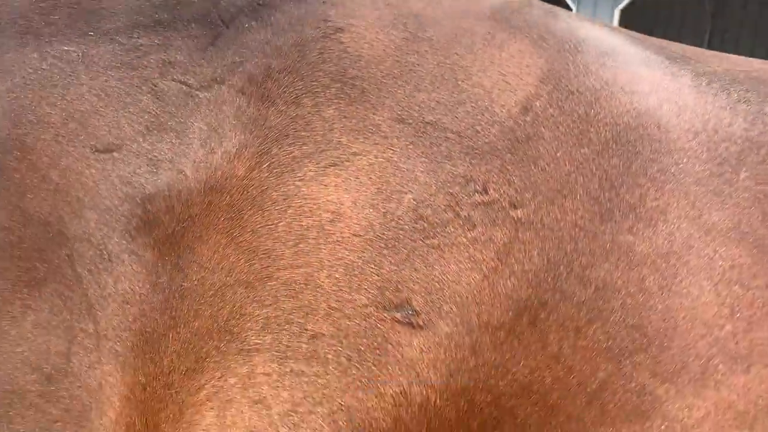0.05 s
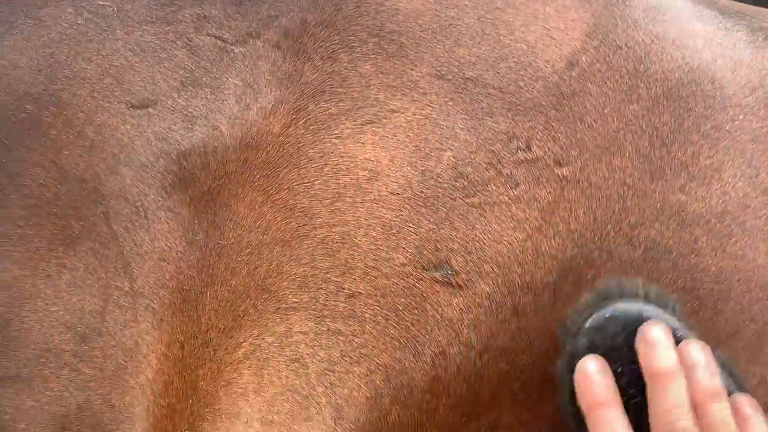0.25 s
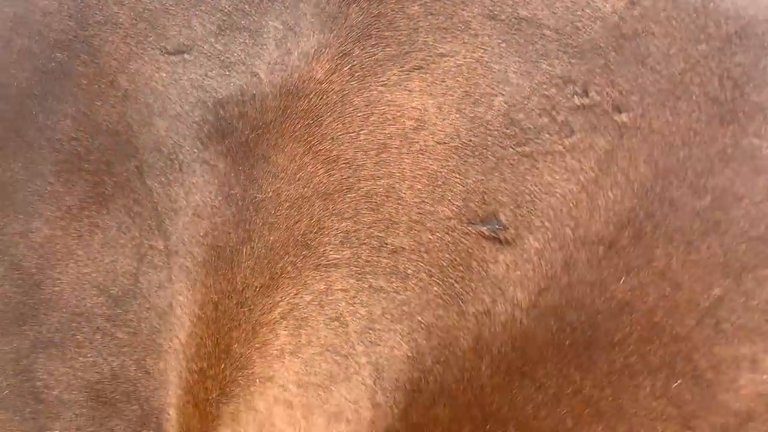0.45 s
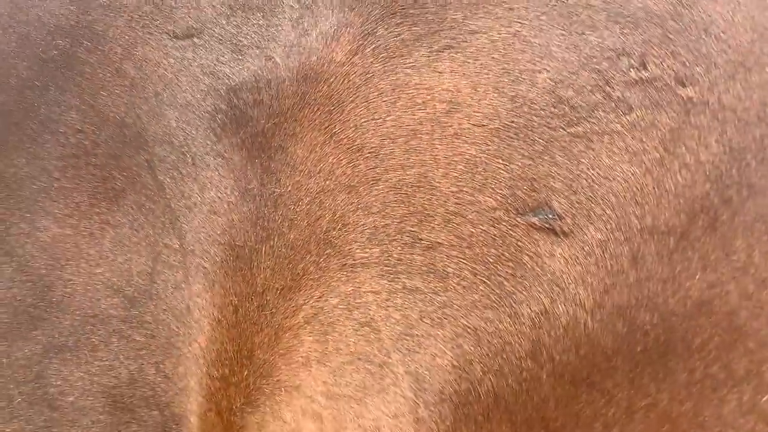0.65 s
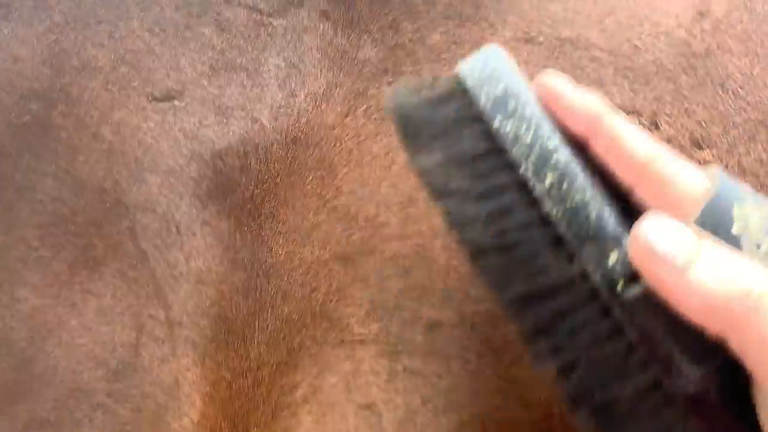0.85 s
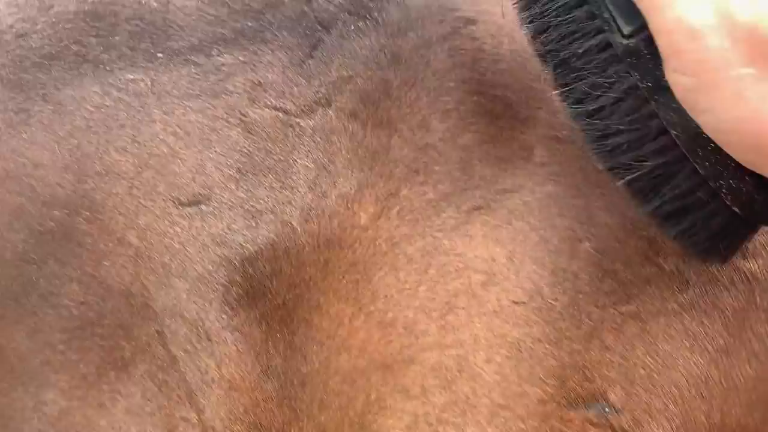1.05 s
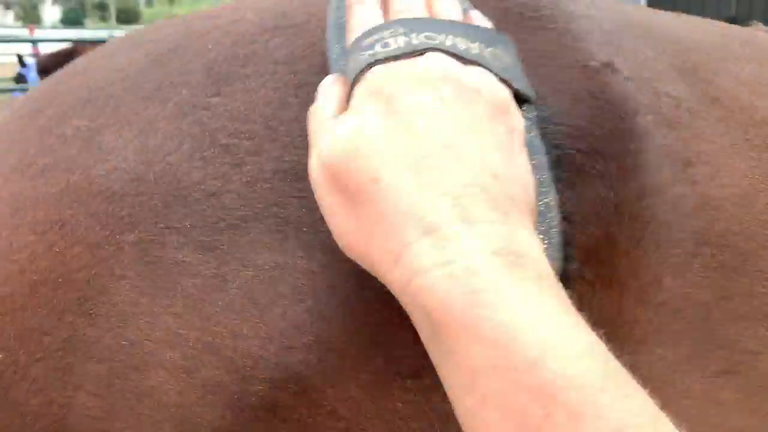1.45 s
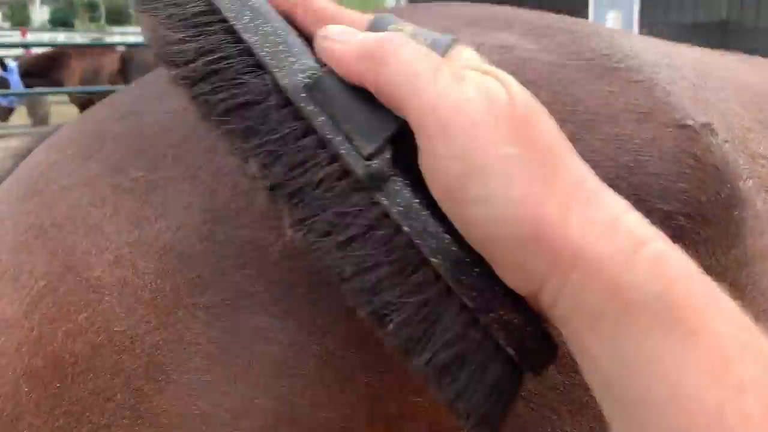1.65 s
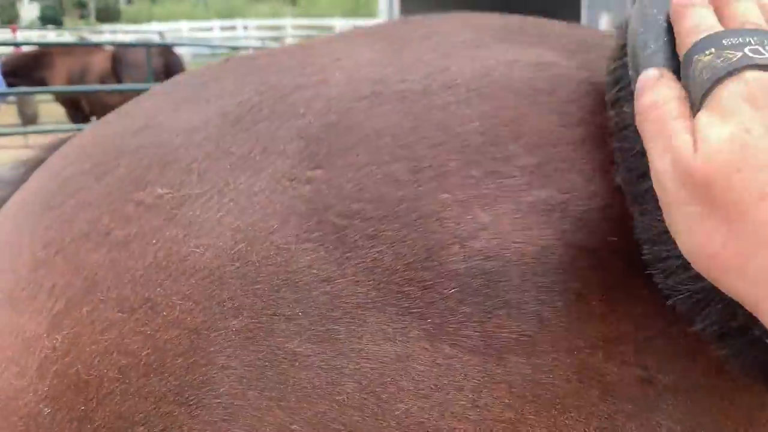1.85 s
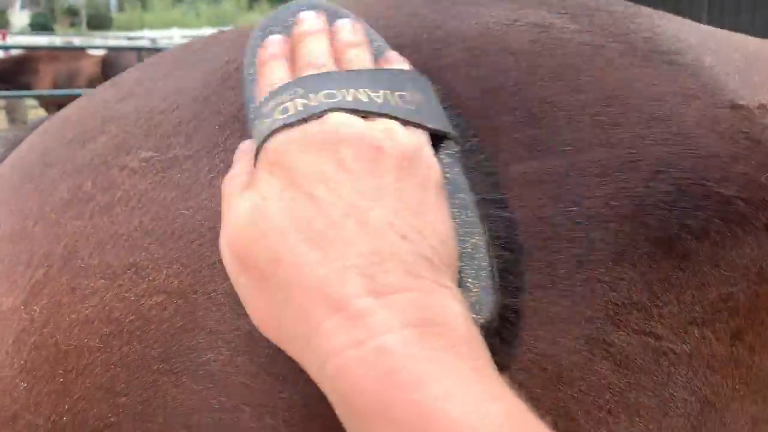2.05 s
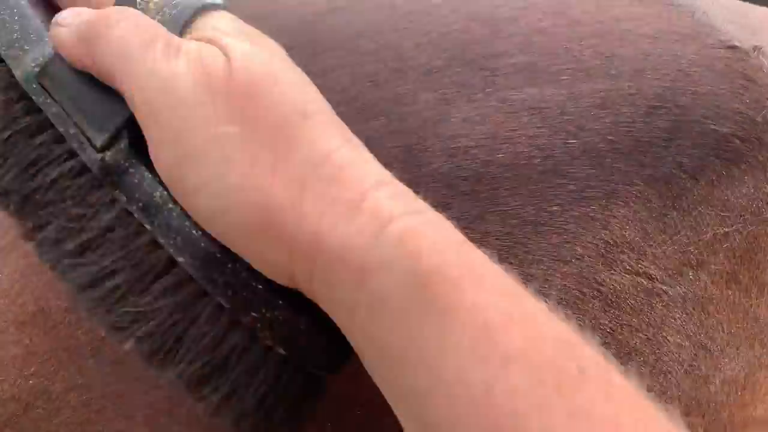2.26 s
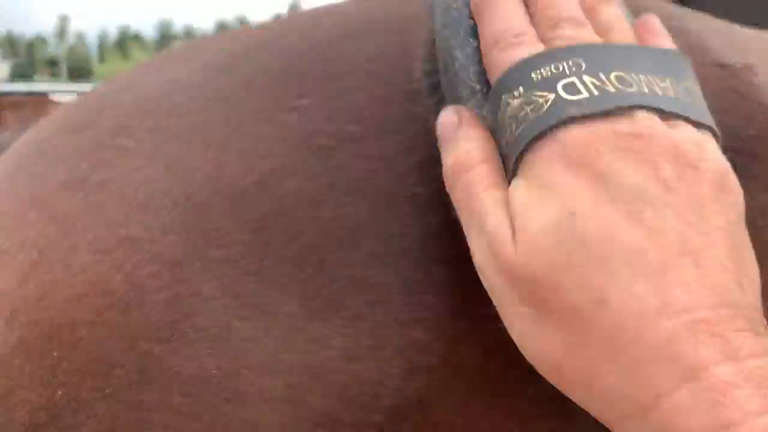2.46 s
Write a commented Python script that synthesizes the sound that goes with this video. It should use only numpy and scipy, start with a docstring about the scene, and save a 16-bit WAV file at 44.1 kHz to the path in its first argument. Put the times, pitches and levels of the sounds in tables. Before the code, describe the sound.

A bristle brush swishes over a horse's coat, close up, at about 0.3 to 0.6 seconds, 1.3 to 1.7 and 1.9 to 2.3, each stroke brightening and ending in a flick. Light clicks and clacks fall near 0.1, 0.8, 1.1 and 1.8 seconds. The microphone takes a soft bump at 0.25 seconds, then more bumps and low rumble from 1.4 to 2.1, over quiet outdoor air.

```python
"""Brushing a horse

A bristle brush sweeps over a horse's coat in short strokes, close to a hand-held stereo microphone.
Each stroke is a dense shower of bristle ticks that brightens with speed and ends in a flick.
Light clacks and clicks fall mostly between the strokes. The hand gives the microphone soft bumps
and rumble, over a quiet yard with a fading hum."""
import sys
import numpy as np
from scipy import signal
from scipy.fft import rfft, irfft
from scipy.io import wavfile
from scipy.ndimage import uniform_filter1d

SR = 44100
rng = np.random.default_rng(int(sys.argv[2]) if len(sys.argv) > 2 else 0)


def transcribe(signal):
    """Save signal, clipped to [-1, 1], as a 16-bit WAV file at the path in sys.argv[1]."""
    frames = np.atleast_2d(signal).T
    limited = np.clip(frames, -1, 1)
    pcm = np.round(limited * 32767).astype(np.int16)
    wavfile.write(sys.argv[1], SR, pcm)


N = 110250
TIME = np.arange(N) / SR
EVENT_TIME = np.arange(-4096, 8192) / SR  # seconds from the peak of a short event


def amp(db):
    """Decibels as an amplitude ratio."""
    return 10 ** (np.asarray(db) / 20)


def unit(x):
    """Normalisation to rms 1."""
    return x / np.sqrt(np.mean(x ** 2))


def envelope(rows):
    """Gain over time, interpolated between (seconds, dB) points."""
    return amp(np.interp(TIME, *np.array(rows).T))


def over_hz(rows, size):
    """Interpolation of (Hz, value) points on a log-frequency axis."""
    hz, value = np.array(rows).T
    return np.interp(np.log(np.fft.rfftfreq(size, 1 / SR) + 1), np.log(hz), value)


def band(x, lo_hz, hi_hz, order=4):
    """Zero-phase band-pass filtering, scaled to rms 1."""
    hz = np.fft.rfftfreq(x.shape[-1], 1 / SR) + 1
    detuning = (hz ** 2 - lo_hz * hi_hz) / (hz * (hi_hz - lo_hz))
    return unit(irfft(rfft(x) / np.sqrt(1 + (detuning ** 2) ** order), x.shape[-1]))


def pan(db):
    """Intensity panning: two gains, the left db above the right."""
    return amp(np.array([[db], [-db]]) / 2)


def pair(three, correlation):
    """Partial coherence: two channels mix one shared signal with one of their own each."""
    shared = np.clip(correlation, 0, 1)
    return np.sqrt(shared) * three[0] + np.sqrt(1 - shared) * three[1:]


def noise(correlation, size):
    """Partly coherent stereo white noise."""
    return pair(rng.standard_normal((3, size)), correlation)


def burst(t, rise, fall):
    """A bell-shaped rise up to t = 0, then the exponential decay of damping."""
    return np.exp(-(np.minimum(t, 0) / rise) ** 2 - np.maximum(t, 0) / fall)


def add(out, x, at):
    """Superposition of a short sound on out, starting at a time in seconds."""
    first = int(round(at * SR))
    begin, end = max(first, 0), min(first + x.shape[-1], N)
    if end > begin:
        out[..., begin:end] += x[..., begin - first:end - first]


def echo(x, db, decay_s=0.026, size=8192):
    """Diffuse reflection from nearby surfaces adds a short tail, thin in the bass."""
    t = np.arange(size) / SR
    tail = band(rng.standard_normal((2, size)), 490, 20000, order=2)
    tail *= np.exp(-t / decay_s) * (1 - np.exp(-t / 0.002))
    tail /= np.sqrt(np.sum(tail ** 2, axis=1, keepdims=True))
    return x + amp(db) * signal.oaconvolve(x, tail, axes=1)[:, :N]


def yard(air_db=-61, hum_hz=238):
    """Diffuse outdoor sound, coherent only at long wavelengths, with a low rustle and a fading hum."""
    # Each row: frequency in Hz, relative spectral density in dB.
    air_spectrum = [(20, -10.5), (45, -1.5), (70, -1), (130, -3.5), (200, -11.5), (320, -21.5),
                    (550, -27.5), (1100, -26.5), (2400, -37), (3500, -46), (7000, -53), (11000, -53),
                    (15000, -62.5)]
    # Each row: frequency in Hz, correlation of the channels from 0 to 1.
    air_correlation = [(100, 1), (260, 0.66), (550, .3), (1500, 0), (5000, 0)]
    # Each row: time in seconds, gain of the air in dB.
    air_swell = [(0, 2.5), (.25, -0.5), (.85, 0.5), (1.3, 0.5), (1.7, 0), (2.0, -4), (2.5, -3)]
    # Each row of both: time in seconds, level in dB.
    rustle_levels = [(0, -77.5), (.5, -78.5), (.92, -89.5), (1.0, -71.5), (1.2, -72.5), (1.4, -72),
                     (1.58, -72), (1.8, -77), (2.2, -84.5), (2.5, -89)]
    hum_levels = [(0, -62.5), (.3, -66), (.6, -70.5), (.9, -75), (1.2, -88)]
    white = pair(rfft(rng.standard_normal((3, N))), over_hz(air_correlation, N))
    air = unit(irfft(white * amp(over_hz(air_spectrum, N)), N))
    rustle = envelope(rustle_levels) * band(noise(0.075, N), 305, 577, order=2)
    waver = band(rng.standard_normal(N), 1.8, 4.9, order=2)
    cycles = np.cumsum(hum_hz * (1 + .005 * waver)) / SR
    hum = envelope(hum_levels) * np.sqrt(2) * np.sin(2 * np.pi * cycles)
    return amp(air_db) * envelope(air_swell) * air + rustle + hum


def handling(glide_s=0.013):
    """Structure-borne sound: the moving hand gives the microphone rumble and damped bumps."""
    # Each row: time in seconds, level in dB.
    rumble_levels = [(0, -75.5), (1.0, -69.5), (1.5, -58.5), (1.66, -48), (1.77, -44.5), (1.845, -53),
                     (1.89, -51), (1.96, -44), (2.05, -39.5), (2.15, -55.5), (2.5, -63.5)]
    # Each row: time in seconds, centre frequency in Hz, level in dB, rise and fall in seconds,
    # downward glide in octaves on each side of the centre.
    bumps = [(0.2412, 125, -34, 0.0017, 0.005, 0.19), (0.2496, 336, -36.5, 0.0028, 0.0064, 0.32),
             (0.2576, 137.3, -21.5, 0.0054, 0.011, 1.4), (.283, 68, -34.5, .006, .005, 0.),
             (0.832, 70.3, -50, 0.012, .02, 0.14), (0.9053, 82.3, -45.5, 0.0065, 0.023, 0.),
             (1.079, 62, -38.5, 0.025, 0.024, 0.19), (1.4365, 64.7, -34.5, 0.0096, 0.015, 0.31),
             (1.611, 57, -29, 0.011, 0.0088, 0.53), (1.765, 77.7, -41, 0.076, 0.033, 0.),
             (1.889, 84.5, -42, 0.025, 0.022, 0.15), (2.009, 57.5, -26.5, 0.024, 0.028, 0.095),
             (2.011, 200.5, -38.5, 0.0028, 0.0085, 0.), (2.027, 228, -42.5, 0.0024, 0.0054, 0.28),
             (2.0992, 74.5, -39.5, 0.014, 0.0087, 0.)]
    out = envelope(rumble_levels) * band(noise(0.99, N), 36.3, 92.7, order=3)
    for at, hz, db, rise, fall, glide in bumps:
        cycles = np.cumsum(hz * 2 ** (-glide * np.tanh(EVENT_TIME / glide_s))) / SR
        cycles -= np.interp(0, EVENT_TIME, cycles)
        swell = uniform_filter1d(burst(EVENT_TIME, rise, fall), size=64)
        add(out, amp(db) * swell * np.sin(2 * np.pi * cycles), at + EVENT_TIME[0])
    return out


def clacks():
    """Heavy damping broadens a resonance, so each clack or scuff is a short band of noise."""
    # Each row: time in seconds, level in dB, rise and fall in seconds, centre and width in Hz, pan in dB.
    knocks = [(.126, -65.5, 0.0034, 0.017, 2290, 1100, -1.5), (.124, -65.5, 0.0016, 0.0073, 983, 500, 1),
              (0.124, -76.5, 0.0019, .005, 4410, 700, -1), (.2485, -58.5, 0.0037, 0.0017, 430, 222, 6.5),
              (0.282, -59, 0.0065, 0.008, 290, 220, 0), (.772, -63, 0.00076, 0.0037, 1330, 1400, 6),
              (.786, -75, 0.015, 0.013, 1480, 1300, -2), (0.799, -85.5, 0.2, 0.12, 2480, 1070, -0.5),
              (0.826, -67.5, 0.0031, .004, 900, 900, 0), (.903, -67.5, 0.00085, 0.0023, 1090, 700, -2),
              (1.124, -60.5, 0.013, 0.0068, 2410, 1100, 4.5),
              (1.126, -71.5, 0.017, 0.0081, 4000, 2000, -0.5), (1.174, -64.5, 0.0088, 0.025, 442, 220, -5),
              (1.739, -55.5, 0.0088, .012, 186, 110, -1), (1.777, -59.5, 0.0056, .011, 2410, 900, 6),
              (1.784, -60, .003, 0.008, 1520, 590, 6), (1.782, -87, .008, .008, 6000, 5000, 4),
              (1.81, -66.5, 0.0097, 0.022, 1740, 1390, 2.5), (2.012, -54.5, 0.0063, 0.0095, 251, 200, 4.5),
              (2.076, -77, 0.015, 0.066, 3800, 2000, -2), (2.201, -58, 0.0036, 0.0034, 239, 260, -1),
              (2.324, -70.5, 0.0011, .003, 1820, 1500, 7), (2.393, -79.5, 0.0097, 0.014, 2170, 700, 8.5)]
    out = np.zeros((2, N))
    for at, db, rise, fall, hz, width, pan_db in knocks:
        middle = np.hypot(hz, width / 2)  # makes hz the geometric mean of the band edges
        white = noise(np.interp(hz, [350, 900], [.97, .7]), len(EVENT_TIME))
        body = band(white, middle - width / 2, middle + width / 2, order=3)
        add(out, amp(db) * pan(pan_db) * burst(EVENT_TIME, rise, fall) * body, at + EVENT_TIME[0])
    return echo(out, db=-6.5)


def clicks():
    """Impact excitation: each hard contact of the brush rings one mode for a few cycles."""
    # Each row: time in seconds, frequency in Hz, level in dB, rise and fall in seconds, pan in dB.
    impacts = [(.1177, 2390, -58.5, 0.00044, .001, 5), (.1246, 2370, -48, 0.00066, 0.00057, 3.5),
               (1.483, 1630, -52.5, 0.00022, 0.0011, -5), (1.7757, 2280, -54, 0.00058, .0012, 8),
               (1.779, 2150, -50.5, 0.0007, 0.00094, 14), (1.7852, 1970, -48.5, 0.0029, 0.0023, 12)]
    out = np.zeros((2, N))
    for at, hz, db, rise, fall, pan_db in impacts:
        ring = burst(EVENT_TIME, rise, fall) * np.sin(2 * np.pi * hz * EVENT_TIME)
        add(out, amp(db) * pan(pan_db) * ring, at + EVENT_TIME[0])
    return echo(out, db=-13.5)


def ticks(correlation, lag_share, size, per_second=12000, spread_db=3.5):
    """Shot noise: uneven bristle ticks, coloured by the brush and late at the left microphone port."""
    # Each row: frequency in Hz, gain of the brush in dB.
    bristle_colour = [(900, -0.5), (1350, 4), (1700, 0), (2300, 1), (3200, -1.5), (4400, 2), (5400, -0.5),
                      (6600, 0), (7800, -0.5), (8700, -1), (9500, -0.5), (10300, 4.5), (12000, 1),
                      (15000, 1)]
    # Each row: frequency in Hz, phase of the left port relative to the right in radians.
    port_phase = [(2000, 0), (2400, -0.9), (3300, -3.5), (4400, -6.5), (5400, -10.5), (6300, -12),
                  (7600, -15.5), (8600, -18.5), (10400, -17.5), (12700, -21), (15500, -24)]
    hit = rng.random((3, size)) < per_second / SR
    strength = rng.choice([-1, 1], (3, size)) * amp(spread_db * rng.standard_normal((3, size)))
    left, right = rfft(pair(hit * strength, correlation)) * amp(over_hz(bristle_colour, size))
    left *= np.exp(1j * lag_share * over_hz(port_phase, size))
    return irfft(np.array([left, right]), size)


def hair_zip(speed, slow_hz=1485, fast_hz=2135, width_hz=450, touch_db=-11):
    """Passing frequency: hairs zip by as narrow-band noise whose pitch and level rise with speed."""
    cycles = np.cumsum(slow_hz + (fast_hz - slow_hz) * speed) / SR
    flutter = band(noise(0.52, len(speed)), 10, width_hz / 2, order=2)
    onset = amp(touch_db * (1 - speed) ** 2) * np.minimum(speed * 10, 1)
    return np.sqrt(2) * np.sin(2 * np.pi * cycles) * flutter * onset


def brush(entry_db=-23, zip_db=-8.5, judder_db=0.87, flick_s=0.011, release_s=.006, size=20480):
    """Friction of bristles on hair: treble enters as speed grows, pressure eases, the tips flick free."""
    # Each row: start, full speed and lift-off in seconds, levels of rub, scrape, rasp, swish and hiss
    # in dB, flick gain in dB, pan in dB, factor on the hiss's entry speed, share of port lag below swish.
    strokes = [(-.3, -.12, 0.00092, -83, -65, -72, -75.5, -75.5, -1.5, -4, 1, 0.71),
               (.32, 0.524, 0.6263, -69.5, -63, -69, -71, -70.5, -5.5, -10.5, 1, 0.062),
               (1.33, 1.549, 1.685, -66, -73.5, -71.5, -75.5, -67.5, 1, -6, 1.12, 0.91),
               (1.892, 2.2, 2.297, -76.5, -74.5, -77.5, -88.5, -68.5, 4, -3, 0.46, 0.89)]
    # Rub, scrape, rasp, swish and hiss. Each row: low and high edge in Hz, entry speed as a share of
    # full speed, easing in dB, weight of the flick, correlation of the channels, share of the pan.
    bristle_bands = [(1024, 2030, 0.05, -14.5, 0.088, 0.38, -.2), (1970, 3820, 0.14, -4.5, 0.53, .45, .3),
                     (3730, 6000, 0.2, -3, 0.49, 0.76, 0.9), (5880, 7870, 0.55, -1.5, 2.95, 0.45, 0.31),
                     (8460, 20800, 0.45, -2, 1.22, 1, 0.)]
    # Bristles catch on the coat. Each row: time in seconds, level in dB, rise and fall time in seconds.
    snags = [(1.545, -66, 0.0097), (2.21, -70, 0.013), (0.43, -81.5, .003)]
    out = np.zeros((2, N))
    for start, full, lift, *levels, flick_db, pan_db, hiss_delay, lag_share in strokes:
        t = start + np.arange(size) / SR
        judder = amp(judder_db * band(rng.standard_normal(size), 2.7, 78, order=2))
        speed = np.clip((t - start) / (full - start), 0, 1)
        easing = np.clip((t - full) / (lift - full), 0, 1) ** 2
        release = np.exp(-np.maximum(t - lift, 0) / release_s)
        flick = amp(flick_db) * burst(t - lift + flick_s, flick_s, flick_s)
        scrape_db = levels[1]
        add(out, amp(scrape_db + zip_db) * hair_zip(speed) * release, start)
        for db, delay, row in zip(levels, (1, 1, 1, 1, hiss_delay), bristle_bands):
            lo_hz, hi_hz, entry_speed, ease_db, flick_weight, correlation, pan_share = row
            shortfall = (1 - speed) / (1 - min(entry_speed * delay, .9))
            contact = amp(entry_db * shortfall ** 2 + ease_db * easing) * release
            shower = band(ticks(correlation, lag_share if lo_hz < 5000 else 1, size), lo_hz, hi_hz)
            gain = amp(db) * judder * (contact + flick_weight * flick)
            add(out, shower * gain * pan(pan_db * pan_share), start)
    for at, db, length in snags:
        shower = band(ticks(correlation=1, lag_share=1, size=len(EVENT_TIME)), 2500, 9400)
        add(out, amp(db) * burst(EVENT_TIME, length, length) * shower, at + EVENT_TIME[0])
    return echo(out, db=-15.5)


def scene():
    """Independent sources add by superposition."""
    return brush() + clacks() + clicks() + handling() + yard()


def record(dry):
    """Band limiting: the recorder's steep low-pass filter cuts the top of the treble."""
    cutoff_hz = 15700
    return signal.sosfilt(signal.ellip(10, .2, 70, cutoff_hz, fs=SR, output="sos"), dry)


dry = scene()
out = record(dry)
transcribe(out)
```